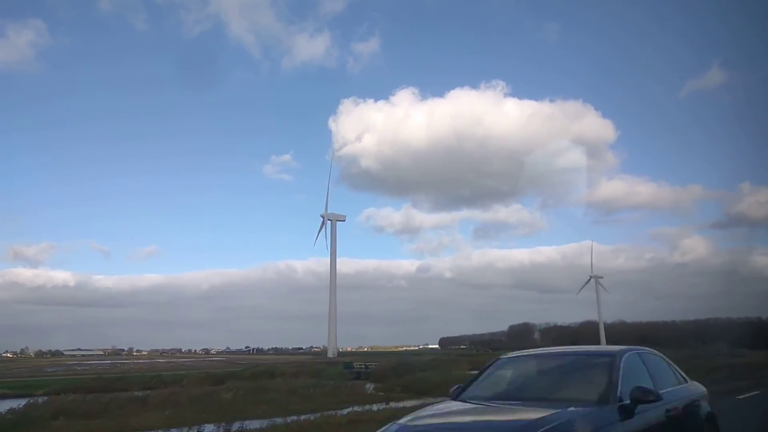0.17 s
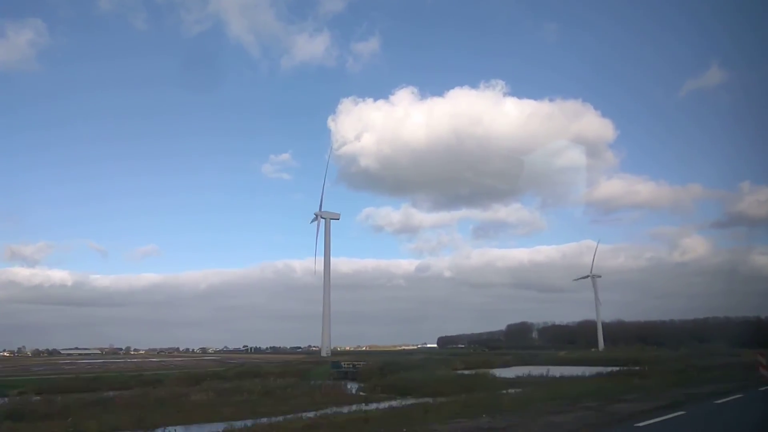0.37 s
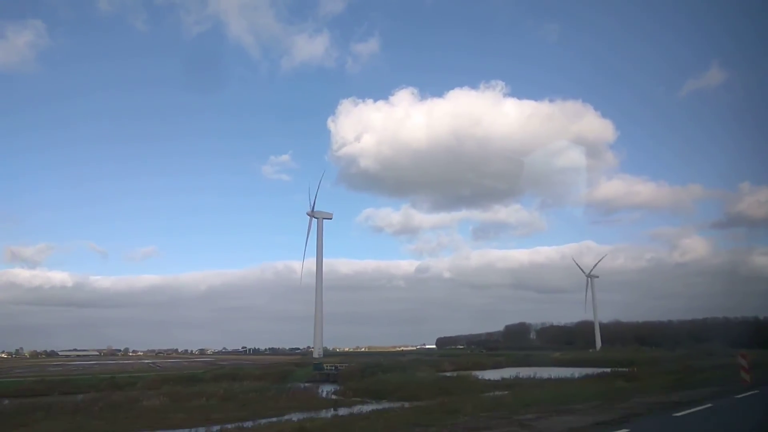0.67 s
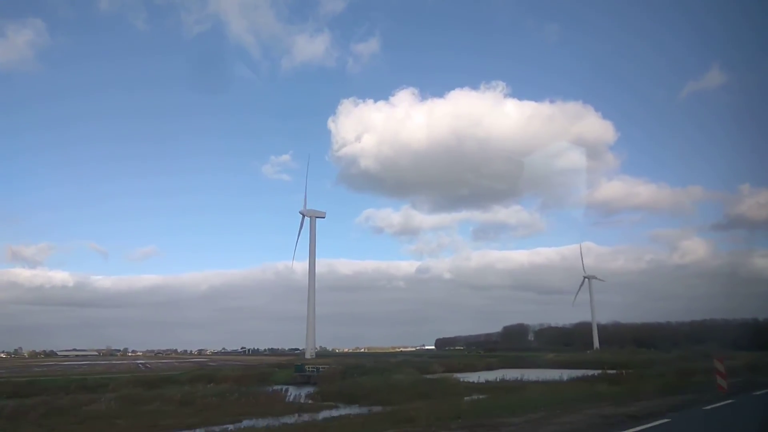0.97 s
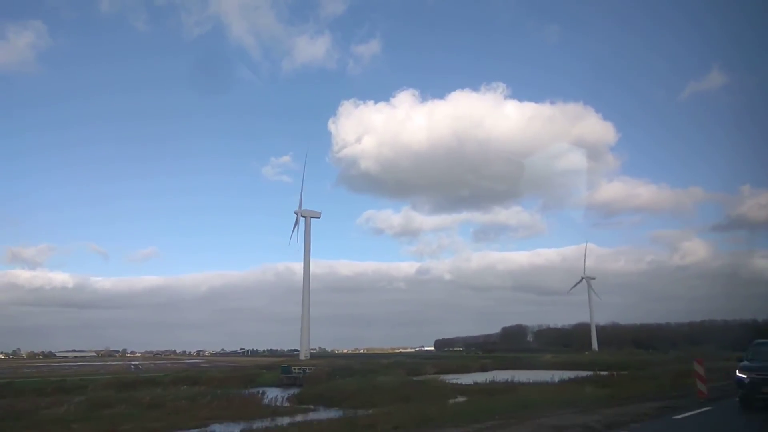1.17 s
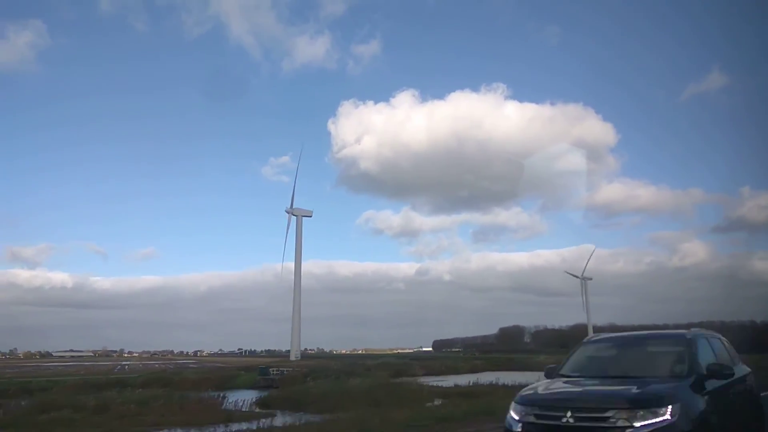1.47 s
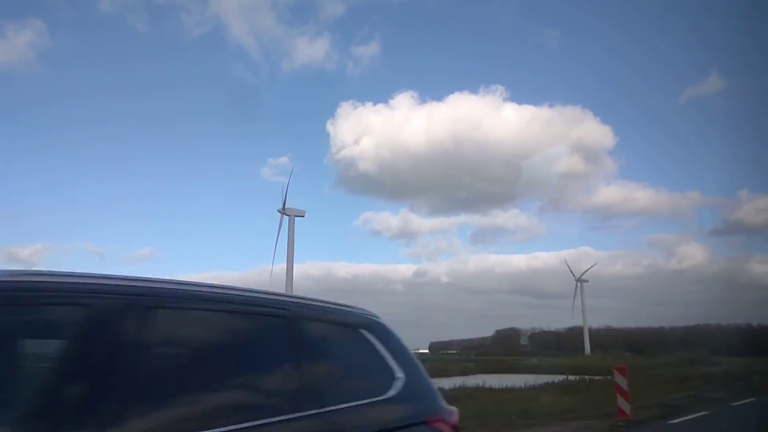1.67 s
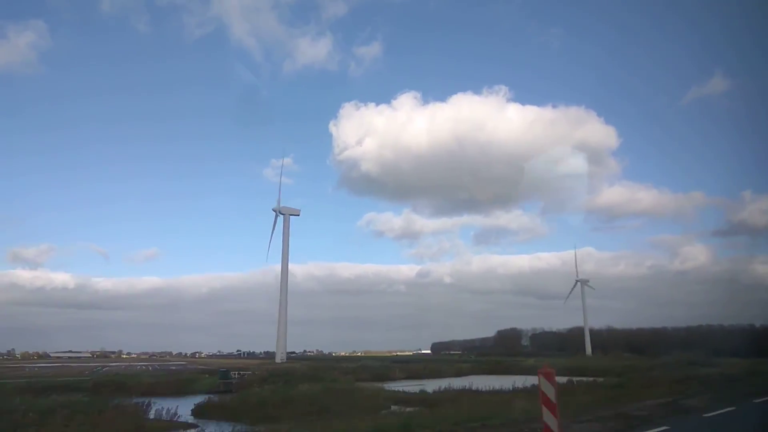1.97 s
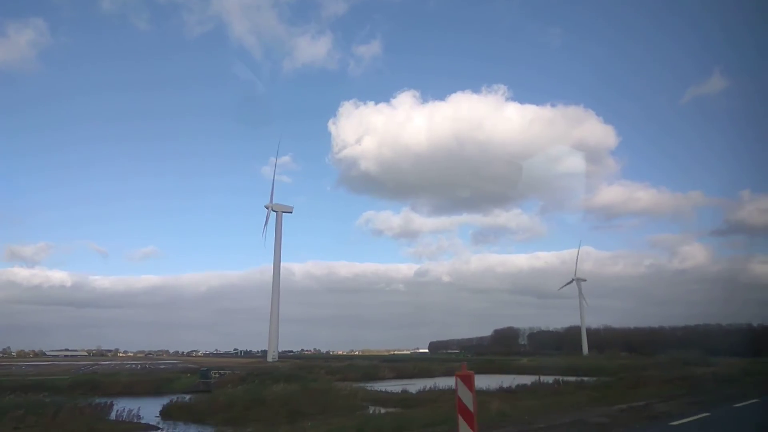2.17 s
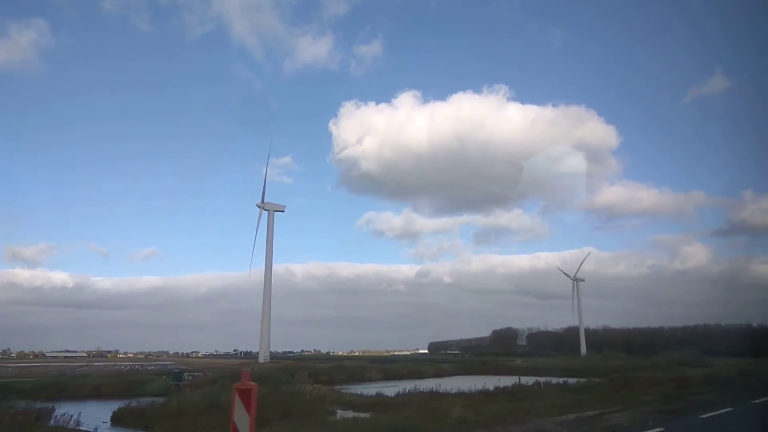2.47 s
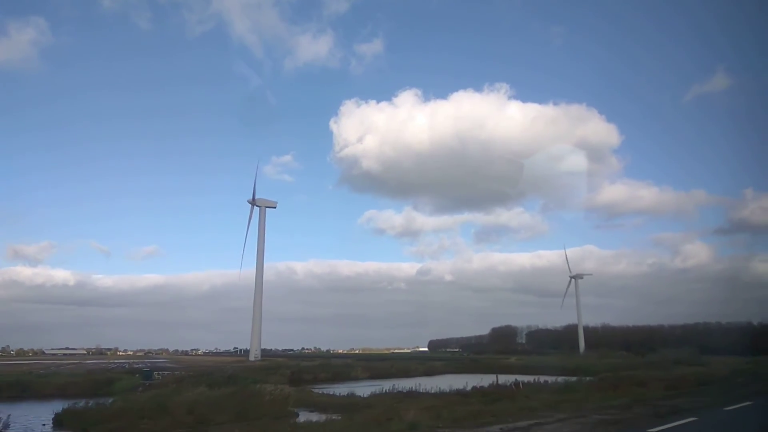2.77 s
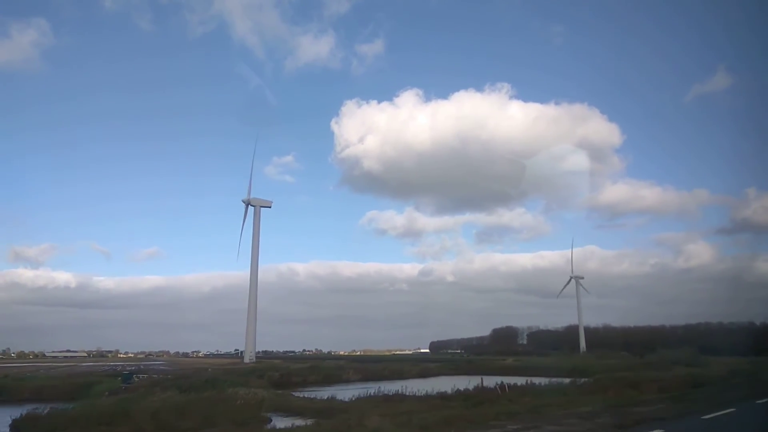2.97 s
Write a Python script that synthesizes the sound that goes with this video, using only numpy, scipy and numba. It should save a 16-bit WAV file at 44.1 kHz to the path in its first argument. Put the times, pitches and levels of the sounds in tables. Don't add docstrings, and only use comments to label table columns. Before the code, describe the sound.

Two quick car pass-by whooshes over the steady low rumble of a driving car's cabin

```python
import sys
import numpy as np
from scipy import signal
from scipy.fft import rfft, irfft
from scipy.io import wavfile
from scipy.ndimage import uniform_filter1d
from numba import njit

SR = 44100
rng = np.random.default_rng(int(sys.argv[2]) if len(sys.argv) > 2 else 0)


def linear_from_db(decibels):
    return 10 ** (np.asarray(decibels, float) / 20)


def put_to_file(sound):
    columns = np.atleast_2d(sound).T
    safe = np.clip(columns, -1, 1)
    whole_steps = np.round(safe * 32767)
    wavfile.write(sys.argv[1], SR, whole_steps.astype(np.int16))


N = 137592
TIME_S = np.arange(N) / SR


def level(x, db):
    return x * linear_from_db(db) / np.sqrt(np.mean(x ** 2))


def curve(table, col):
    rows = np.array(table, float)
    return np.interp(TIME_S, rows[:, 0], rows[:, col])


def colour(x, points, share=0.89):
    rows = np.array(points, float)
    hz = np.maximum(np.arange(N // 2 + 1) * SR / N, 1)
    db = np.interp(np.log(hz), np.log(rows[:, 0]), rows[:, 1])
    return irfft(rfft(x) * linear_from_db(share * db), N)


@njit
def svf(x, hz, width, low):
    y, b, l = np.empty(len(x)), 0., 0.
    for i in range(len(x)):
        g, k = np.tan(np.pi * hz[i] / SR), width / hz[i]
        v = (b + g * (x[i] - l)) / (1 + g * (g + k))
        y[i] = l + g * v if low else k * v
        b, l = 2 * v - b, l + 2 * g * v
    return y


def ring_noise(drive, centre_hz, width_hz, outer_hz):
    inner = svf(drive * rng.standard_normal(N), centre_hz, width_hz, False)
    return svf(inner, centre_hz, outer_hz, False)


def walk(rate):
    k = int(SR / rate)
    held = np.repeat(rng.standard_normal(N // k + 1), k)
    return 1.285 * uniform_filter1d(uniform_filter1d(held, k), k)[:N]


def pair(mid, side):
    return np.array([mid + side, mid - side])


FLOOR_DB = -90


def electronic_floor():
    hiss = rng.standard_normal((2, N))
    return linear_from_db(FLOOR_DB) * pair(hiss[0] + .2 * hiss[1], 1.1 * hiss[1])


# time_s, level_db
ROUGHNESS = [(0.0, -27), (0.67, -28), (0.82, -32), (0.83, -29), (0.96, -29), (1.06, -44), (1.09, -37),
             (1.29, -35), (1.37, -29), (1.71, -31.5), (2.08, -26.5), (2.34, -34.5), (2.49, -24),
             (2.55, -30.5), (2.69, -29.5), (2.88, -33.5), (2.92, -26), (3.12, -30)]


def roughness_db():
    return curve(ROUGHNESS, 1)


# frequency_hz, density_db per Hz
HUM_SPECTRUM = [(190, -26), (330, -5), (523, -15.5), (1030, -29), (1210, -31.5), (1420, -29.5), (2720, -48),
                (4000, -49), (6500, -61.5), (8450, -96), (14300, -120)]
HUM_DB, HUM_FOLLOW, HUM_LATE_DB = -51.5, .2, 6
HUM_RIGHT_DB, SHARED_HZ = 2, 1110


def hum():
    mid = level(colour(rng.standard_normal(N), HUM_SPECTRUM), 0)
    side = level(colour(rng.standard_normal(N), HUM_SPECTRUM), 0)
    road = roughness_db()
    swell_db = HUM_FOLLOW * (road - road.mean()) + HUM_LATE_DB * np.arange(N) / N + 0.48 * walk(11.0)
    out = 0
    for hz in 280 * 2 ** np.arange(0, 4.9, .5):
        centre = np.full(N, hz)
        share = min(hz / SHARED_HZ, 1)
        band = pair(svf(mid, centre, hz / 3, False), share * svf(side, centre, hz / 3, False))
        balance = linear_from_db(share * HUM_RIGHT_DB * np.array([[-.5], [.5]]))
        out = out + linear_from_db(2.0 * walk(14)) * band * balance / np.hypot(1, .5 * share)
    return out * linear_from_db(HUM_DB + swell_db)


# start_s, strength_db, length_s,
# rattle_db, rattle_hz
JOINT_HITS = [(0.963, -38, 0.029, -58.5, 600), (1.39, -53, .05, -58, 1930), (2.114, -50, .11, -50.5, 896),
              (2.423, -51, .12, -49.5, 540), (1.618, -50.5, 0.047, -49.5, 582),
              (1.074, -26, 0.052, -88, 2920), (2.167, -40, 0.042, -62.5, 3000),
              (2.215, -34.5, 0.029, -72, 3560), (2.423, -38, 0.056, -69, 2530),
              (2.612, -32, 0.017, -53, 2600), (2.622, -42, 0.014, -59, 5460),
              (2.903, -60, 0.08, -57.5, 1500), (2.917, -53, 0.068, -59.5, 5230)]


def joint_shape(start_s, length_s, rise_s):
    age = np.maximum(TIME_S - start_s, 0)
    return (1 - np.exp(-age / rise_s)) * np.exp(-age / length_s)


def joint_force():
    return sum(linear_from_db(db) * joint_shape(s, length, .003) for s, db, length, _, _ in JOINT_HITS)


# frequency_hz, width_hz, level_db, side_share (0-1)
BOOM_MODES = [(35, 16, -31, .15), (91, 27, -12.5, 0.17), (152, 27, -19.5, 0), (50.3, 12, -16, .17),
              (73, 14, -7, .12), (89.1, 16, -7.5, 0.1), (124.5, 37, -2.5, 0.17), (187, 12, -8, 0.01),
              (216.8, 35, -8, 0.01), (246.8, 23, -10.5, .25), (296.7, 24, -12.5, 0.5),
              (336.5, 14, -14.5, 0.3), (427, 15, -22.5, .5)]


def boom():
    drive = linear_from_db(roughness_db() - 1.0) + joint_force()
    out = 0
    for hz, width, db, share in BOOM_MODES:
        centre = hz * (1 + 0.0078 * walk(3))
        mid = ring_noise(drive, centre, 1. * width, 4.3 * width)
        side = ring_noise(drive, centre, 1. * width, 4.3 * width)
        evenness = np.sqrt(SR / width / 12)
        out = out + linear_from_db(db + 1.5 * walk(5.18)) * evenness * pair(mid, share * side)
    return out


# peak_s, level_db, mode_hz, spread_s
ROAD_BUMPS = [(0.048, -30.5, 79, 0.014), (0.057, -31.9, 191.6, 0.028), (0.106, -32, 309, 0.011),
              (0.11, -28, 82, 0.014), (0.21, -27.5, 79.7, 0.017), (0.248, -32.5, 314, 0.025),
              (0.26, -28, 195.6, 0.019), (0.349, -28, 194, 0.0097), (0.352, -27.5, 81.5, 0.016),
              (0.498, -28.5, 79.8, 0.021), (0.522, -34.7, 243, 0.015), (0.568, -29, 192, 0.013),
              (0.603, -31.5, 310, 0.0076), (0.629, -33.9, 240.2, 0.025), (0.685, -32, 308, 0.0095),
              (0.861, -31, 192, 0.019), (0.891, -27.5, 78.5, 0.018), (0.975, -30, 299, 0.013),
              (0.978, -32, 81, 0.027), (1.112, -25.5, 81.7, 0.024), (1.166, -30.5, 187.2, 0.052),
              (1.232, -27.5, 82.8, 0.015), (1.407, -32.5, 237.5, 0.02), (1.429, -29, 83, 0.01),
              (1.679, -30.5, 79, 0.028), (1.755, -33, 312.7, 0.05), (1.829, -26.5, 88.5, 0.019),
              (1.852, -30.0, 193, 0.016), (1.867, -36, 300, 0.017), (1.915, -28.5, 187, 0.042),
              (1.969, -29.9, 76, 0.017), (2.033, -33, 322, 0.012), (2.053, -28.5, 78.6, 0.033),
              (2.093, -33, 230, 0.024), (2.094, -34, 303, 0.016), (2.164, -35, 237.6, 0.013),
              (2.164, -25.5, 82.4, 0.014), (2.244, -25, 84, 0.014), (2.401, -29, 81, 0.011),
              (2.455, -35.5, 323, 0.026), (2.462, -30, 191, 0.021), (2.508, -24.5, 83, 0.035),
              (2.619, -27.3, 82, 0.024), (2.649, -25, 187, 0.014), (2.713, -26.5, 85, 0.013),
              (2.936, -25, 82, 0.024), (2.964, -33.5, 190, 0.027), (3.102, -28.5, 81, 0.0087)]
BUMP_SIDE, BUMP_FALL, BUMP_GRIT = 0.1, 1.15, .35
BUMP_TUNE, BUMP_TILT_DB = 0.98, -1.5


def bumps():
    out = 0
    chance = rng.random((len(ROAD_BUMPS), 2))
    grit = 1 + BUMP_GRIT * walk(60)
    for (s, db, hz, spread), (start, side) in zip(ROAD_BUMPS, chance):
        age = TIME_S - s
        width_s = max(spread, .006) * np.where(age > 0, BUMP_FALL, 1)
        swell = np.exp(-.5 * (age / width_s) ** 2)
        tone = np.sin(2 * np.pi * (BUMP_TUNE * hz * age + start))
        ring = linear_from_db(db + BUMP_TILT_DB * np.log2(hz / 80)) * swell * grit * tone
        out = out + pair(ring, BUMP_SIDE * (side - 1) * ring * hz / 80)
    return out


def rattles():
    out = 0
    for s, _, length, db, hz in JOINT_HITS:
        buzz = []
        for _ in range(2):
            chatter = rng.standard_normal(N) * linear_from_db(1.9 * walk(170))
            buzz.append(svf(chatter, np.full(N, 1. * hz), .5 * hz, False))
        trim = colour(np.array(buzz), [(300, 11), (5200, 0.5), (6300, -11.5)])
        balance = linear_from_db(np.array([[-2], [2]]))
        out = out + linear_from_db(db + 11.5) * joint_shape(s, length, .3 * length) * trim * balance
    return out


# time_s, level_db
ENGINE_LEVEL = [(0.0, -46.5), (0.41, -39), (0.43, -47), (0.67, -35), (0.82, -46), (0.87, -34.5),
                (1.02, -44.5), (1.19, -37), (1.23, -45), (1.4, -34), (1.46, -44.5), (1.52, -32),
                (1.81, -42.5), (2.01, -29), (2.37, -39), (2.4, -31.5), (3.07, -32.5), (3.12, -36)]
# firing_multiple, level_db
FIRING_ORDERS = [
    (.5, -8.5),
    (1, -0.5),
    (1.5, -16),
    (2, -17),
]
FIRING_HZ, RISE_HZ_PER_S = 141.2, 5.8


def engine():
    hz = FIRING_HZ + RISE_HZ_PER_S * TIME_S
    phase = 2 * np.pi * np.cumsum(hz * (1 + 0.0032 * walk(11))) / SR
    tone = 0
    for k, db in FIRING_ORDERS:
        tone = tone + linear_from_db(db + 2.0 * walk(15)) * np.sin(k * phase + k * k)
    return pair(tone * np.sqrt(2) * linear_from_db(curve(ENGINE_LEVEL, 1)), 0)


# frequency_hz, density_db per Hz
TYRE_SPECTRUM = [(210, -28), (350, -4), (516, -1.5), (760, -2.5), (1250, -14.5), (1670, -11), (2370, -24.5),
                 (4660, -27.5), (6960, -30), (9050, -62.5), (15300, -120)]
PORT_LAG_SAMPLES = 14
WAKE_DB, HIDE_S = -12, .16


def tyre_roar(near, hidden):
    own = colour(rng.standard_normal((2, N)), [(400, -6.5), (1200, 3.5)], share=0.96)
    shared = rng.standard_normal(N)
    shared = np.array([np.roll(shared, PORT_LAG_SAMPLES), shared])
    hiding_db = WAKE_DB * np.clip((TIME_S - hidden) / HIDE_S + .5, 0, 1)
    return level(colour(shared + own, TYRE_SPECTRUM), 0) * near ** 0.59 * linear_from_db(hiding_db)


# frequency_hz, width_hz, level_db, far_strength (0-1), fore_aft_beaming (0-1), ahead_db
TREAD_WHISTLES = [
    (3800, 330, 4.5, 0.59, .95, 3),
    (4700, 360, -2, 0, 1, 7),
    (3056, 120, -11.5, 0.96, 0.4, -2),
    (890, 840, -6.5, 0.3, 0.5, -8),
]
DOPPLER_SHARE, DRIFT, WAVER_DB = .05, .018, 1.5


def tread_whistles(near, aft, whistle_db, widen, beam_power, low_db, pitch):
    out = 0
    for hz, width, db, far, beam, ahead in TREAD_WHISTLES:
        centre = pitch * hz * (1 - DOPPLER_SHARE * aft) * (1 + DRIFT * walk(13))
        ring = np.array([ring_noise(1., centre, widen * width, 2. * widen * width) for _ in range(2)])
        tone = level(ring, db + (whistle_db if hz > 2000 else low_db) - 14)
        aim = 1 - np.clip(beam, 0, 1) * near ** beam_power
        out = out + tone * aim * near ** (1 - far) * linear_from_db(WAVER_DB * walk(25) - ahead * aft)
    return out


FRONT_LEAD_S, FRONT_S, FRONT_DB, FRONT_HZ = 0.12, .06, -13.5, 4520
SWISH_S, SWISH_HZ = 0.069, 1756


def near_flow(since_abeam, swish_db, swish_lead, swish_fall):
    def swell(lead, spread):
        return np.exp(-.5 * ((since_abeam + lead) / spread) ** 2)

    def burst(centre, width):
        return level(np.array([ring_noise(1., centre, width, width) for _ in range(2)]), 0)

    flare = linear_from_db(FRONT_DB) * swell(FRONT_LEAD_S, FRONT_S) * burst(np.full(N, 1. * FRONT_HZ), 1800.)
    falling_hz = SWISH_HZ * np.clip(1 - swish_fall * (since_abeam + swish_lead), .7, 1.3)
    return flare + linear_from_db(swish_db) * swell(swish_lead, SWISH_S) * burst(falling_hz, 380.)


# frequency_hz, left_minus_right_db
EAR_BALANCE = [(400, 4), (900, -10.5), (1700, -5.5), (2500, -9), (3900, -13.5), (6500, -4)]
CLOSING_M_S, LANE_M = 19.9, 4.04
SHADE_DB, SHADE_S, WAKE_S = -10.5, 0.0036, 0.27
GLASS_HZ, GLASS_FAR_HZ = 6560, 4676


def car(seen, abeam, hidden, db, whistle_db, widen, beam_power, swish_db, swish_lead, swish_fall, low_db, pitch):
    along = CLOSING_M_S * (TIME_S - abeam)
    distance = np.hypot(along, LANE_M)
    near, aft = LANE_M / distance, along / distance
    sound = tyre_roar(near, hidden)
    sound = sound + tread_whistles(near, aft, whistle_db, widen, beam_power, low_db, pitch)
    sound = sound + near_flow(TIME_S - abeam, swish_db, swish_lead, swish_fall)
    glass_edge = GLASS_FAR_HZ + (GLASS_HZ - GLASS_FAR_HZ) * near ** 1.424
    for _ in range(8):
        sound = np.array([svf(ear, glass_edge, 1.373 * 5000, True) for ear in sound])
    in_view = 1 / (1 + np.exp(-np.clip((TIME_S - seen) / SHADE_S * 4, -50, 50)))
    ahead_db = SHADE_DB * (1 - in_view) * (1 + np.maximum(seen - TIME_S, 0) / 0.37)
    fade_db = -8 * np.maximum(TIME_S - hidden, 0) / WAKE_S
    sound = sound * linear_from_db(db + ahead_db + fade_db + WAVER_DB * 0.75 * walk(21.98))
    return np.array([colour(ear, EAR_BALANCE, share=sign) for ear, sign in zip(sound, (.5, -.5))])


# seen_s, abeam_s, hidden_s, level_db, whistle_db
PASSES = [
    (-.05, 0.406, 0.73, -45.5, 0),
    (1.394, 1.785, 2.126, -45.5, -1),
]
# whistle_widening, beam_power, swish_db, swish_lead_s, swish_fall per s, low_band_db, pitch_factor
PASS_TONES = [
    (1.6, 4, -8, 0.0067, .2, 0, .96),
    (1.2, 8.8, -4, 0.029, 2.3, -12, 1.),
]


def passing_cars():
    return sum(car(*row, *tone) for row, tone in zip(PASSES, PASS_TONES))


# frequency_hz, width_hz, level_db
CABIN_COLOUR = [(903, 300, 3.5), (1670, 40, 3), (2205, 50, 5), (2600, 500, 1.5), (3940, 50, -3),
                (5360, 380, 0)]
PATCHY_DB, PATCH_HZ, PATCH_S = 2.7, 130, .035


def cabin_reflections(ears):
    hz, _, spec = signal.stft(ears, SR, nperseg=1024)
    field = rng.standard_normal(spec.shape)
    bins, frames = max(int(PATCH_HZ / hz[1]), 1), max(int(PATCH_S * SR / 512), 1)
    for _ in range(2):
        field = uniform_filter1d(uniform_filter1d(field, size=bins, axis=1), size=frames, axis=2)
    fixed_db = sum(db / (1 + (2 * (hz - f) / width) ** 2) for f, width, db in CABIN_COLOUR)
    gain_db = PATCHY_DB * field / field.std() + fixed_db[:, None] - 1.5
    return signal.istft(spec * linear_from_db(gain_db), SR, nperseg=1024)[1][:, :N]


# frequency_hz, level_db
MIC_RESPONSE = [(15, 0), (6500, 0), (7250, -8)]


def microphones(ears):
    return colour(ears, MIC_RESPONSE)


def scene():
    low = boom() + bumps() + engine()
    broadband = hum() + rattles() + passing_cars()
    return electronic_floor() + low + microphones(cabin_reflections(broadband))


def roll_off(x):
    return signal.sosfilt(signal.butter(12, 15720, fs=SR, output="sos"), x)


def record(dry):
    return roll_off(dry)


dry = scene()
out = record(dry)
put_to_file(out)
```